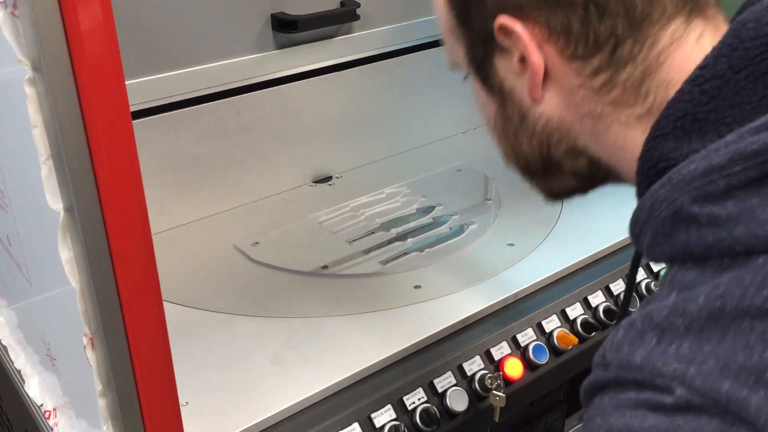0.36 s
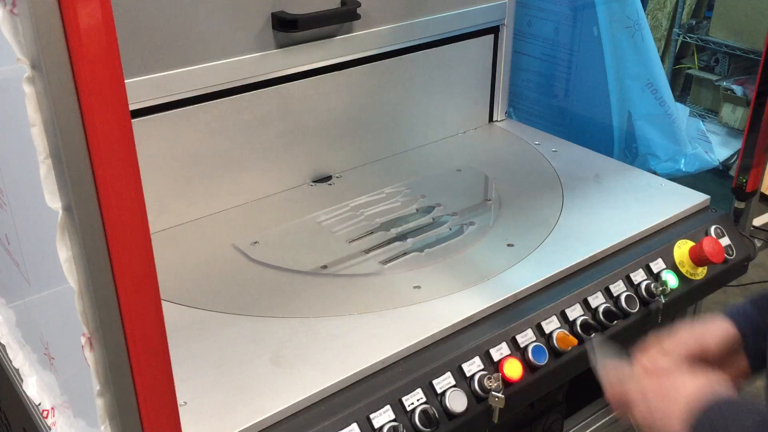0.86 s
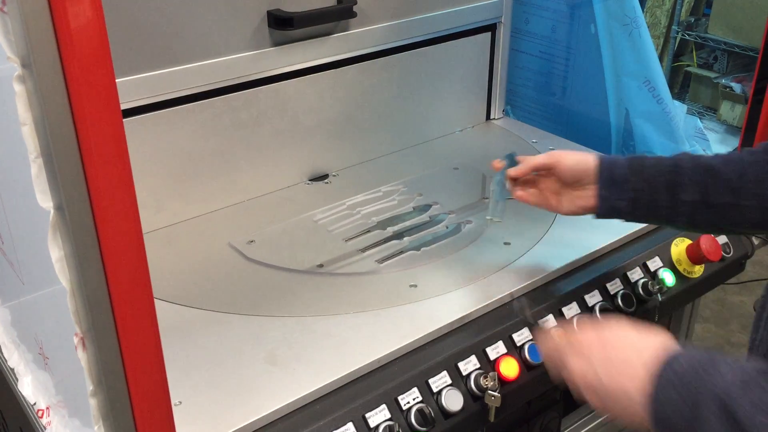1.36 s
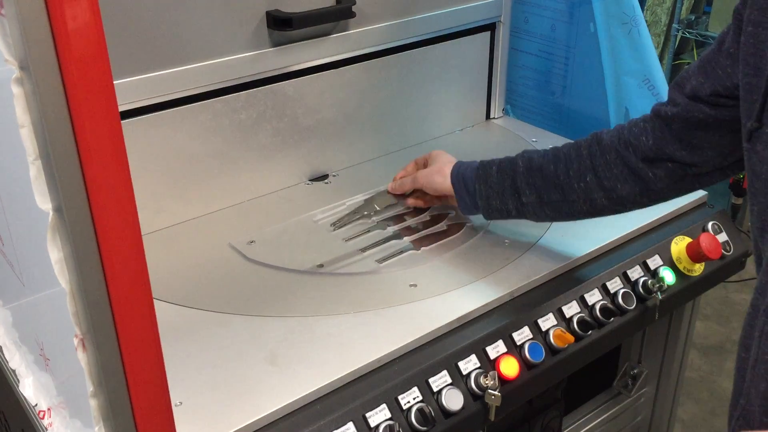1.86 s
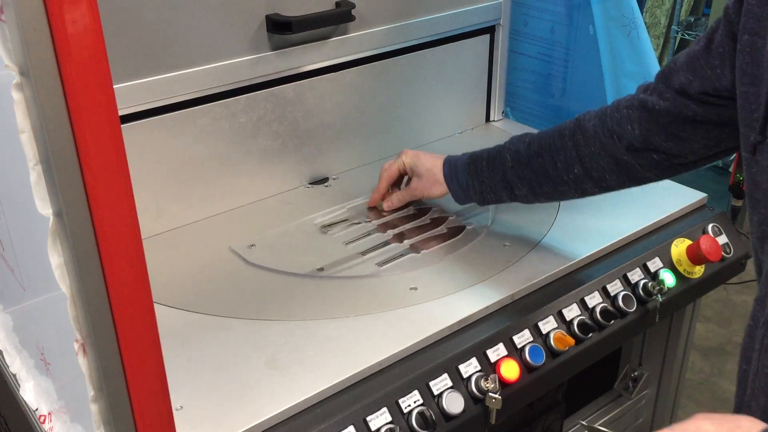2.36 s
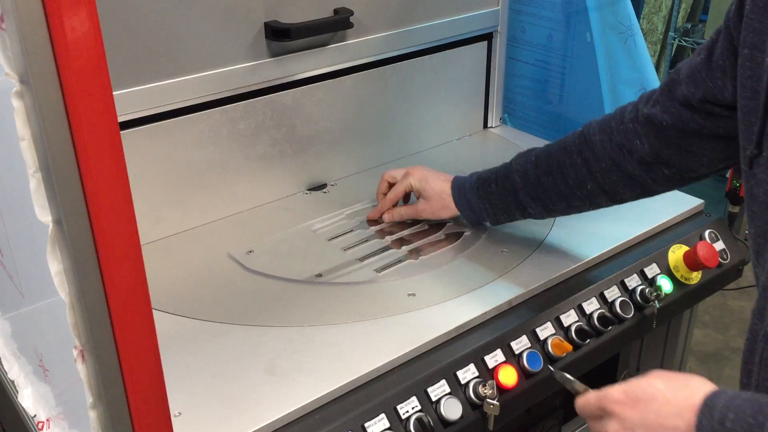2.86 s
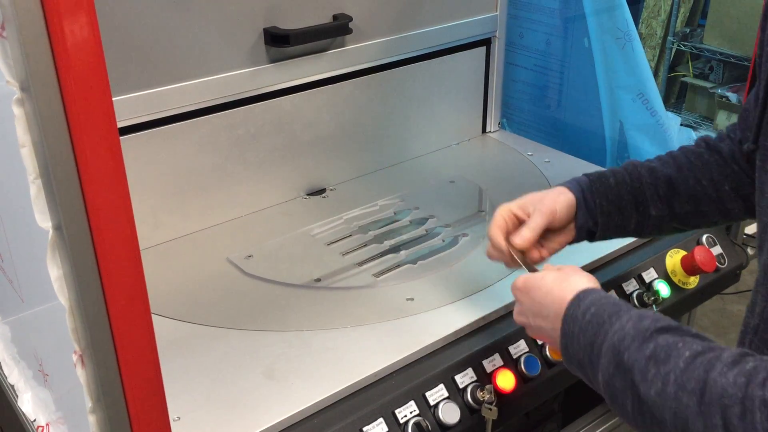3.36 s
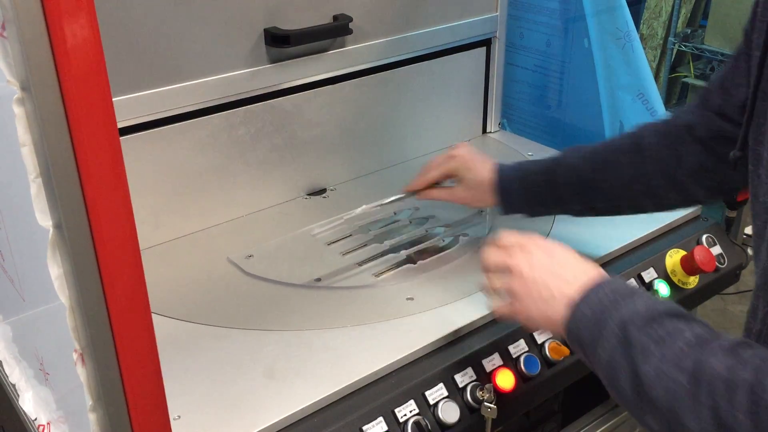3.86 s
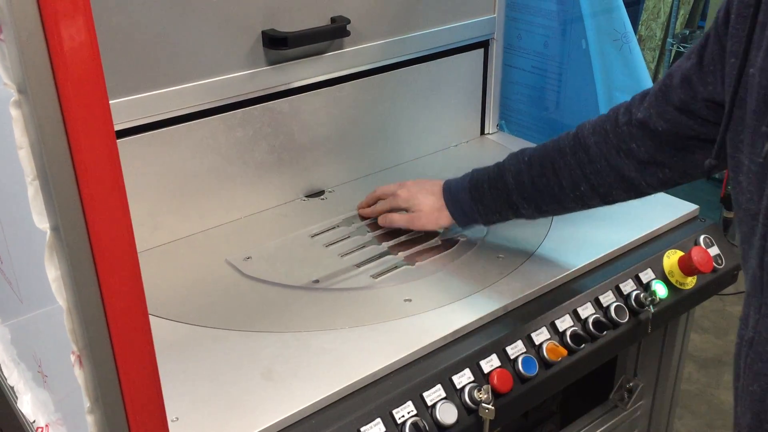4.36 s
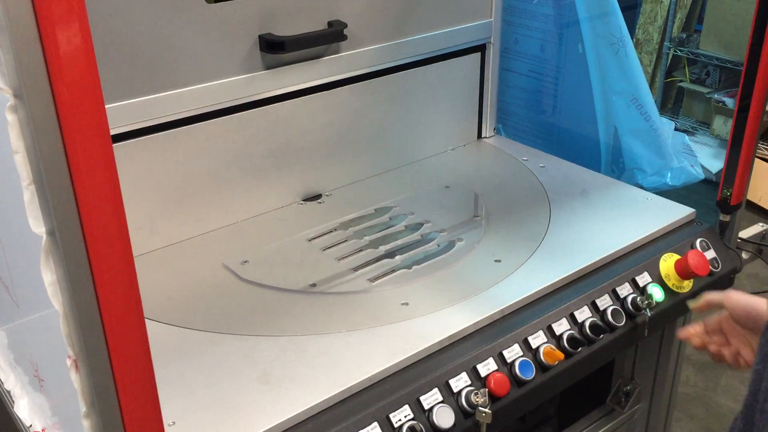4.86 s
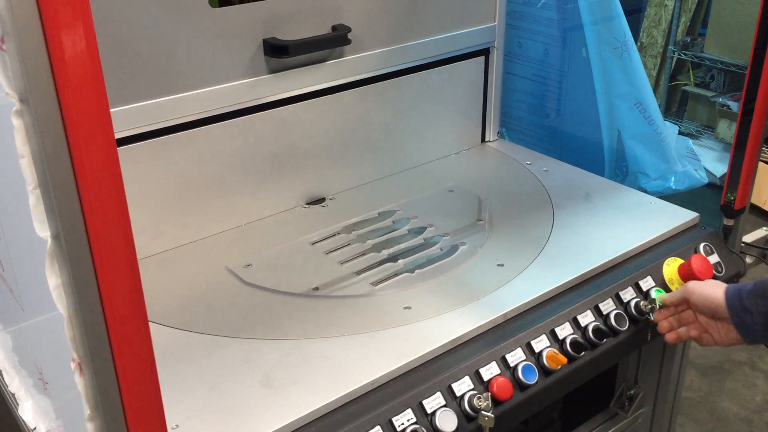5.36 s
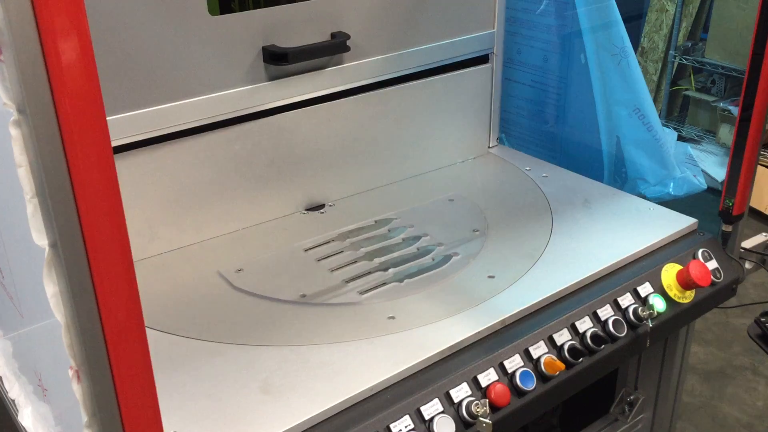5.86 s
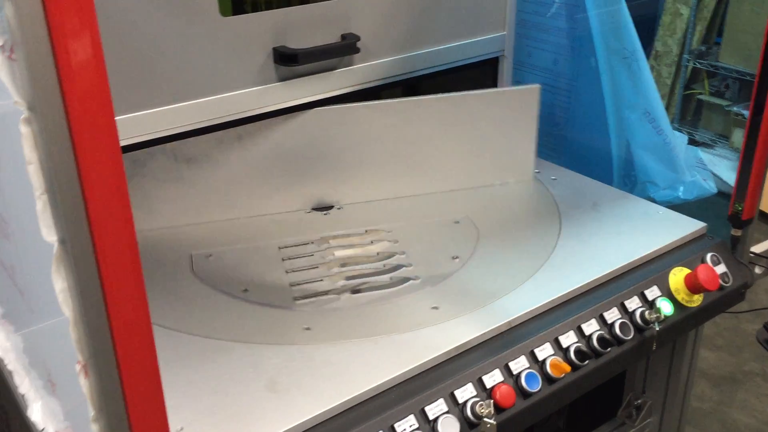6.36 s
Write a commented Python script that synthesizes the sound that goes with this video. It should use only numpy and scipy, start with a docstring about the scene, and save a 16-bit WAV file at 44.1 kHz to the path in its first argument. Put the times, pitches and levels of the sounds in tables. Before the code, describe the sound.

Bright clicks and ringing rattles of small hard parts on a metal plate, distant machine thumps, a button press, an air vent and fading drive whirr.

```python
"""Hard thin strips laid into the slots of a metal fixture click, rattle and ring: decaying modes plus noise cracks.
Far machines thump and a valve vents as swelling noise bands, some with a low sine boom; a button is pressed.
The table drive starts as wandering resonant noise with hissing puffs of air.
A steady hum of fans and motors, broad noise with narrow resonances, lies under all."""
import sys
import numpy as np
from scipy import signal
from scipy.fft import rfft, irfft
from scipy.io import wavfile

SR = 44100
rng = np.random.default_rng(int(sys.argv[2]) if len(sys.argv) > 2 else 0)


def to_wav(s):
    """Save 16-bit WAV."""
    ch = np.atleast_2d(s).T  # columns
    pcm = np.round(np.clip(ch, -1, 1) * 32767)  # PCM
    wavfile.write(sys.argv[1], SR, pcm.astype(np.int16))


def volts_from_decibels(level):
    """Turn decibel levels (scalar or array-like) into linear amplitude factors."""
    exponent = np.asarray(level, float) / 20
    return 10 ** exponent


N = 297219

# broad fan noise: (frequency [Hz], relative density [dB])
FAN_COLOUR = [(15, -63.5), (25, -22.5), (60, -11), (114, -8.5), (259, 0.5), (330, -12), (389, -10),
              (600, -4), (787, -11.5), (1280, -9.5), (1510, -17.5), (1640, -16), (3230, -28), (6210, -36),
              (16500, -54)]
# resonances of the hum: (frequency [Hz], width [Hz], rms level [dB])
HUM_BANDS = [(63, 10, -70.5), (76, 6.1, -69.5), (124.8, 17, -54.5), (162.3, 14, -60.5), (172, 6.4, -62),
             (228, 16, -58.5), (257.6, 25, -57), (394.5, 8, -59.5), (487.5, 5.8, -62), (527, 5.7, -64.5),
             (619, 13, -64), (710.8, 12, -62.5), (966, 20, -62), (1245, 29, -61), (1315, 80, -62),
             (1594, 60, -68), (6200, 500, -80)]
# whirr of the drive: (frequency [Hz], relative density [dB])
WHIRR_COLOUR = [(880, -23.5), (1500, 3), (1800, 2.5), (2440, 4), (2770, -2.5), (3940, 2.5), (4810, -2.5),
                (5220, -5.5), (5920, -6.5), (7630, -18), (8980, -11.5), (10300, -22), (13000, -21)]
# resonances of the drive housing: (frequency [Hz], width [Hz], relative level [dB])
HOUSING_BANDS = [(2886, 40, 4.5), (3210, 99, -2.5), (3830, 48, 4), (4465, 87, 0), (5180, 130, -6.5),
                 (5420, 34, 2.5), (6000, 97, -12), (8800, 72, -14), (9110, 110, -17)]
# puffs of air while the table turns: (start [s], length [s], hiss [dB], swell of the whirr [dB])
AIR_PUFFS = [(5.536, 0.027, -66, 10.5), (5.822, .085, -65, 2), (6.16, 0.14, -71, 3.5),
             (6.62, .06, -78, 0.5)]
# two thumps of far machines, then the valve: (time [s], level [dB], rise [s], bass t60 [s], treble t60 [s])
FAR_BLASTS = [(1.262, -27, 0.017, 0.59, 0.23), (4.818, -25.5, 0.014, 0.55, 0.21),
              (5.35, -27, 0.011, 0.35, 0.32)]
# their colours in the same order: (frequency [Hz], relative density [dB])
PRESS_COLOUR = [(59, -45.5), (100, -9), (215, -5.5), (535, -8.5), (801, -11), (872, -10.5), (1680, -18),
                (2520, -15.5), (2860, -20), (8460, -19.5), (16000, -36)]
STAMP_COLOUR = [(59, -53), (100, -29), (202, -4.5), (295, -5.5), (502, -2.5), (836, -15), (970, -5),
                (1130, -12.5), (1650, -21), (2630, -12.5), (3470, -21.5), (5770, -21.5), (16000, -43)]
VALVE_COLOUR = [(59, -32), (100, 5), (234, -3), (350, 0), (461, -8), (535, -18), (970, -11), (1080, -17),
                (1800, -6), (2750, -4.5), (2990, -5), (6020, -6), (16000, -20.5)]
# the floor shakes: (time [s], level [dB])
FLOOR_BOOMS = [(1.291, -44), (5.359, -40)]
# button and small touches: (time [s], level [dB], centre [Hz], half-width [octaves], rise [s], t60 [s])
SMALL_TOUCHES = [(0.736, -48.5, 4540, 1.5, 0.016, 0.15), (2.187, -34, 420, 1.5, 0.0053, 0.2),
                 (2.632, -42, 304, 1.4, 0.0052, 0.31), (2.844, -38.5, 404, 1.4, .003, .15),
                 (4.215, -40.5, 600, 1.2, 0.0057, 1), (5.325, -53.5, 4940, 2.8, 0.011, 0.42),
                 (2.685, -36.5, 254.7, 0.61, 0.0046, .12), (5.309, -57, 11150, 1.2, 0.00092, 0.032),
                 (5.32, -37, 1770, 1.9, 0.00095, 0.15), (5.322, -42, 3960, 1.3, 0.00092, 0.032),
                 (5.541, -44, 3500, 1.9, .008, 0.059)]
# decay of the booth: (frequency [Hz], t60 [s])
BOOTH_DECAY = [(300, 0.67), (1500, 0.36), (5000, 0.17), (12000, 0.11)]
# fixture plate: (frequency [Hz], relative level before halving [dB], free t60 [s])
PLATE_MODES = [(420, -6, 0.024), (519, -3, 0.039), (666, -6, .06), (900, -0.5, 0.021), (1020, -9, 0.098),
               (1256, -17.5, .05), (1278, -17.5, 0.06), (1385, -14.5, 0.098), (1560, -18, .05),
               (1730, 1.5, .05), (1860, 0.5, 0.0397), (2170, -7, 0.041), (2515, -10, .04)]
# blows that reach the plate: (time [s], level [dB], favoured mode [Hz])
PLATE_KNOCKS = [(0.164, -34, 1730), (0.207, -36, 1730), (0.415, -37.5, 1720), (1.979, -37.5, 603),
                (2.092, -37, 800), (2.14, -29, 1040), (2.186, -19.5, 1456), (2.204, -24, 595),
                (2.228, -23.5, 680), (2.491, -36, 921), (2.511, -31.5, 1790), (2.63, -34, 1475),
                (2.665, -48, 1760), (2.689, -37, 585), (2.718, -34.5, 1804), (2.817, -33, 587),
                (2.843, -19, 1405), (4.197, -33, 990), (4.213, -19.5, 1860), (4.235, -26.5, 1840),
                (4.252, -22.5, 996), (4.271, -26.5, 732), (4.313, -39, 960), (4.525, -41.5, 1020)]
# strips: (frequency [Hz], relative level [dB], free t60 [s])
STRIP_MODES = [(2610, -9, .2), (2740, -12, .15), (3170, -9, .1), (3590, -9, .07), (4340, -12, .08),
               (4600, -14, .05), (5150, -5, .06), (5320, -3, .09), (5440, -6, .06), (5710, -8, .05),
               (6050, -9, .06), (6215, -8, .13), (6800, -14, .08), (7310, -3, .12), (7465, -2, .14),
               (7650, 0, .07), (8170, -14, .08), (8800, -18, .06), (9935, -6, .08), (10090, -9, .08),
               (10190, -4, .08), (11315, -5, .09), (11495, -5, .08), (12100, -9, .16), (12390, -9, .1),
               (12800, -6, .06), (13070, -5, .07), (13815, -4, .09), (14310, -5, .08), (15450, -12, .08),
               (15735, -5, .08)]
# a strip left free rings on with a thin tone: (time [s], level [dB], frequency [Hz], t60 [s])
THIN_TONES = [(0.0438, -51, 2645, 0.47), (.474, -55.5, 10820, 1), (0.473, -37, 3390, 0.21),
              (1.114, -56, 7470, 0.15), (1.114, -59, 12100, 0.21), (2.189, -48.5, 11150, 0.27),
              (2.188, -41.5, 2787, 0.35), (0.475, -29, 9920, 0.12), (2.187, -28, 10190, .12),
              (2.513, -36, 10300, 0.096), (2.5122, -36.5, 13070, 0.066), (2.5121, -38, 3243, .1),
              (1.034, -48, 6000, .06), (2.847, -21.5, 6215, 0.2), (2.847, -45.5, 11080, 0.4),
              (2.846, -36.5, 2730, 0.34), (4.254, -20.5, 11300, 0.068), (4.3143, -39, 15480, .2),
              (4.524, -77, 12140, 0.48)]
# dry contact cracks, alone or on top of a ringing clink: (time [s], level [dB], relative treble [dB])
DRY_CRACKS = [(1.8411, -47.5, -5), (1.9804, -31.5, -7), (2.0864, -45, -13.5), (2.092, -39, -10),
              (2.1866, -12, -12), (2.29, -39, -20), (2.492, -33, -8), (2.6317, -35.5, -28.5),
              (2.6666, -47.5, -19.5), (2.6897, -45, -11), (2.719, -40, -25.5), (2.8159, -54.5, 0),
              (2.8357, -31.5, 1), (2.8417, -21, 5), (3.9494, -61.5, -4), (4.0492, -68, -14),
              (4.136, -30, -13.5), (4.1474, -42, -19), (4.1984, -35, 1), (4.214, -27, -14.5),
              (4.313, -22.5, 1), (4.5223, -38, -30)]
# strips shaken in the fingers, one list per stretch: (time [s], level [dB], brightness [dB per band])
SHAKES = [
    [(0.0, -39, -3.5), (0.038, -34.5, -4.5), (0.041, -19.5, -2)],
    [(0.044, -23.5, 4), (0.062, -25.5, -3.5), (0.094, -19, 3.5), (0.146, -28, -1), (0.161, -30, 0)],
    [(0.165, -16, 1.5), (0.203, -25, -0.5), (0.211, -21, 1.5), (0.307, -34.5, -0.5), (0.329, -28.5, 4),
     (0.411, -42.5, -3)],
    [(0.416, -30, 2.5), (0.47, -28, -1.5), (0.476, -30, -0.5), (0.534, -42.5, -2), (0.62, -55, -1.5)],
    [(2.53, -42, -2.5), (2.55, -50, -4.5), (2.62, -60, -2.5)],
    [(2.73, -48.5, -1), (2.778, -62, -1.5), (2.83, -46, -5)],
    [(4.225, -41, -10), (4.243, -32.5, -0.5), (4.259, -19, -1.5), (4.308, -46.5, 0)],
]
# rattle share of the lowest, low, middle and high modes: (share [dB])
RATTLE_SHARES_DB = [-8, -8, -11, -9]
# strip rings against strip or slot:
# (time [s], level [dB], favoured low mode [Hz], relative middle modes [dB], relative high modes [dB])
STRIP_CLINKS = [(0.0432, -20, 3595, -3.5, 0), (0.08, -29, 5290, -6, 11), (0.1625, -21.5, 5020, 3, -8.5),
                (.2071, -18.5, 5360, -2, -6.5), (0.414, -28.5, 5470, -26, -13), (.474, -30, 5430, -6, -3),
                (1.0334, -34, 4340, -32, -16), (1.068, -53, 4530, -24, -7), (1.0835, -41, 4600, -27, -15),
                (1.113, -51.5, 5900, 6, 4), (1.8416, -34, 5560, -10, -10.5),
                (1.8656, -39.5, 5240, -23, -13), (2.139, -15, 5450, -22, -14.5),
                (2.1523, -27.5, 5400, -5, -1.5), (2.188, -12, 5420, -9, -3), (2.203, -27, 5000, -19.5, -9),
                (2.51, -24.5, 5440, -14, -5.5), (2.6487, -40.5, 5360, -20.5, -20),
                (2.718, -28, 5720, -23, -19.5), (2.8424, -10, 5150, 1.5, 6), (2.8463, -11, 6180, -6, -6.5),
                (4.134, -30, 4590, -14, -7), (4.213, -15, 5180, -8, -16), (4.2542, -21, 5180, -3, -18.5),
                (4.2706, -24, 5180, 4.5, -19), (4.313, -16, 5100, -12, -4)]

HELD = 0.48   # share of the free t60 left after a single blow
LOOSE = 0.65   # share of the free t60 left while the strips rattle
MIDDLE_HZ, HIGH_HZ = 6600, 9000   # lower limits of the middle and high strip modes


def rms_one(x):
    """Scale to rms 1."""
    return x / np.sqrt(np.mean(x ** 2) + 1e-20)


def at_hz(points, hz):
    """Read a table on a log-frequency axis."""
    table_hz, value = np.transpose(points)
    return np.interp(np.log(hz), np.log(table_hz), value)


def coloured(points, size=N):
    """Noise of the given relative density, rms 1."""
    hz = np.maximum(np.fft.rfftfreq(size, 1 / SR), 1)
    white = rfft(rng.standard_normal(size))
    return rms_one(irfft(white * volts_from_decibels(at_hz(points, hz)), size))


def band_noise(white, low_hz, high_hz):
    """White noise through a band-pass."""
    return signal.sosfilt(signal.butter(2, [low_hz, high_hz], "band", fs=SR, output="sos"), white)


def drift(knots_per_s):
    """Slow wander: random knots of spread 1 joined by straight lines."""
    knots = rng.standard_normal(int(N / SR * 60))
    return np.interp(np.arange(N) / SR * knots_per_s, np.arange(len(knots)), knots)


def place(s, sound):
    """Place a short sound at its time."""
    return np.pad(sound, (int(s * SR), N))[:N]


def swell_and_die(t, level_db, rise_s, t60_s):
    """Envelope: smooth rise, exponential decay."""
    return volts_from_decibels(level_db - 60 * t / t60_s) * (1 - np.exp(-(t / rise_s) ** 2))


def ring(clicks, hz, t60_s):
    """Two-pole resonator: a unit click starts a decaying sine of height 1."""
    r, w = volts_from_decibels(-60 / (t60_s * SR)), 2 * np.pi * hz / SR
    return signal.lfilter([0, np.sin(w)], [1, -2 * r * np.cos(w), r * r], clicks + 1e-18)


def favour(modes, favoured_hz):
    """Gain [dB], modes by touches: modes near the favoured pitch rise to 0 dB, the others sink."""
    hz, own_db = np.array(modes)[:, :1], np.array(modes)[:, 1:2]
    near = np.exp(-(np.log(hz / favoured_hz) / 0.068) ** 2)
    return (1 - near) * (own_db - 7.5)


def strike(at, modes, force_db, chatter_s, scatter_db):
    """Each touch clicks every mode once, then with three weaker rebounds."""
    out = np.zeros(N)
    luck = rng.standard_normal((len(at), len(modes), 4))
    late = (rng.random((len(at), 3)) * chatter_s * 3 * SR).astype(int)
    for k, (hz, _, t60_s) in enumerate(modes):
        size = volts_from_decibels(force_db[k] + scatter_db * luck[:, k, 0])
        rebound = 0.38 * size[:, None] * np.sign(luck[:, k, 1:])
        clicks = np.zeros(N)
        np.add.at(clicks, at, size * (-1) ** k)
        np.add.at(clicks, at[:, None] + late, rebound)
        out += ring(clicks, hz, HELD * t60_s)
    return out


def cracks(at, level_db, high_db, fade_s):
    """Dry contact: a short puff of noise per touch, in a middle and a top band."""
    out, t = np.zeros(N), np.arange(1500) / SR
    middle = coloured([(900, -39.5), (3000, 3.5), (5500, 1), (8500, -6.5), (10000, -29.0)])
    top = coloured([(7000, -30.5), (9000, 3.5), (16000, -14)])
    for i, mid_db, top_db in zip(at, level_db, level_db + high_db):
        span = slice(i, i + len(t))
        out[span] += np.exp(-t / fade_s) * (volts_from_decibels(mid_db) * middle[span] + volts_from_decibels(top_db) * top[span])
    return out


def hall():
    """Broad fan noise with narrow bands where motors and ducts resonate."""
    fans = volts_from_decibels(-49 + .8 * drift(14)) * coloured(FAN_COLOUR)
    hz = np.fft.rfftfreq(N, 1 / SR)
    white = rfft(rng.standard_normal(N))
    power = sum(volts_from_decibels(level_db) ** 2 / width_hz / (1 + (2 * (hz - f) / width_hz) ** 2) ** 2
                for f, width_hz, level_db in HUM_BANDS)
    return fans + irfft(white * np.sqrt(power * SR * 2 / np.pi), N)


def drive():
    """Gears and bearings whirr broadly and in housing resonances; air escapes in soft bright puffs."""
    since_s = np.arange(N) / SR - 5.47   # drive starts
    t = np.arange(N) / SR
    start_s, length_s, hiss_db, swell_db = np.transpose(AIR_PUFFS)[:, :, None]
    edge_s = 0.015
    gates = .5 * (np.tanh((t - start_s) / edge_s) - np.tanh((t - start_s - length_s) / edge_s))

    whirr_db = -54 - 4.0 * since_s + np.sum(swell_db * gates, axis=0)
    seep = volts_from_decibels(-80)
    leak = volts_from_decibels(-62 - 43 * np.maximum(since_s, 0))
    hiss = seep + leak + np.sum(volts_from_decibels(hiss_db) * gates, axis=0)

    hz = np.fft.rfftfreq(N, 1 / SR)
    white = rfft(rng.standard_normal(N))
    housing = np.zeros(N)
    for f, width_hz, level_db in HOUSING_BANDS:
        band = irfft(white / (1 + (2 * (hz - f) / width_hz) ** 2), N)
        housing += volts_from_decibels(level_db + 4.0 * drift(6)) * band
    body = coloured(WHIRR_COLOUR) + volts_from_decibels(-7.5) * rms_one(housing)
    whirr = volts_from_decibels(whirr_db + 1.17 * drift(5.7)) * body
    air = hiss * coloured([(4000, -13), (9000, 5.5), (16000, -9.0)])
    return (since_s > 0) * (whirr + air)


def far_machines_and_valve():
    """Noise bands swell together and die, the treble first."""
    out, t = np.zeros(N), np.arange(16384) / SR
    hz = np.fft.rfftfreq(len(t), 1 / SR)
    edges_hz = [40, 500, 1400, 4000, 9000, 19000]
    colours = [PRESS_COLOUR, STAMP_COLOUR, VALVE_COLOUR]
    for (s, level_db, rise_s, bass_t60_s, treble_t60_s), colour in zip(FAR_BLASTS, colours):
        spectrum = rfft(coloured(colour, size=len(t)))
        t60s = np.geomspace(bass_t60_s, treble_t60_s, len(edges_hz) - 1)
        for low, high, t60_s in zip(edges_hz, edges_hz[1:], t60s):
            band = irfft(spectrum * (hz >= low) * (hz < high))
            out += place(s, swell_and_die(t, level_db, rise_s, t60_s) * band)
    return out


def floor_booms():
    """The floor shakes as a decaying low sine."""
    out, t = np.zeros(N), np.arange(16384) / SR
    for s, level_db in FLOOR_BOOMS:
        tone = np.sin(2 * np.pi * 60.7 * t)
        out += place(s, volts_from_decibels(level_db - 60 * t / 0.72) * tone * (1 - np.exp(-t / 0.014)))
    return out


def touches():
    """Button and small touches: one band of noise each, swelling and dying."""
    out, t = np.zeros(N), np.arange(16384) / SR
    for s, level_db, centre_hz, octaves, rise_s, t60_s in SMALL_TOUCHES:
        ratio = 2 ** octaves
        colour = [(centre_hz / ratio, -30), (centre_hz, 0), (centre_hz * ratio, -30), (40000, -50)]
        out += place(s, swell_and_die(t, level_db, rise_s, t60_s) * coloured(colour, size=len(t)))
    return out


def booth(x):
    """Sheet-metal booth and far walls answer with a dense noise tail, shorter or fainter in the treble."""
    t, tail = np.arange(22050) / SR, 0
    edges_hz = 200 * 2 ** np.arange(0, 6.6, .5)
    white = rng.standard_normal((2, len(t)))
    for k, (low, high) in enumerate(zip(edges_hz, edges_hz[1:])):
        band = band_noise(white[k % 2], low, high)
        near_walls = volts_from_decibels(-60 * t / at_hz(BOOTH_DECAY, np.sqrt(low * high)))
        # air swallows the treble of the far answer
        dull_db = 11.0 * max(np.log2(low / 4000), 0)
        far_walls = volts_from_decibels(-24 - dull_db - 60 * t / 0.66)
        tail = tail + band * (near_walls + far_walls)
    tail = tail * (1 - np.exp(-(t / 0.0037) ** 2))
    return volts_from_decibels(-7) * signal.fftconvolve(x, tail / np.sqrt(np.sum(tail ** 2)))[:N]


def knocks():
    """Blows reach the fixture plate and ring its modes."""
    s, level_db, plate_hz = np.transpose(PLATE_KNOCKS)
    force_db = level_db + .5 * favour(PLATE_MODES, plate_hz)
    return strike((s * SR).astype(int), PLATE_MODES, force_db, chatter_s=.0042, scatter_db=2.0)


def pings():
    """Decaying tones of free strips, each with a weaker twin mode that makes it beat."""
    out, t = np.zeros(N), np.arange(32768) / SR
    beat_hz, twin_db = 22.0, -6.5
    for s, level_db, hz, t60_s in THIN_TONES:
        tone = np.sin(2 * np.pi * hz * t)
        twin = volts_from_decibels(twin_db) * np.sin(2 * np.pi * (hz + beat_hz) * t)
        out += place(s, volts_from_decibels(level_db - 60 * t / t60_s) * (tone + twin))
    return out


def dry_cracks():
    """Dry contact noise, alone or on top of a ringing clink."""
    s, level_db, treble_db = np.transpose(DRY_CRACKS)
    return cracks((s * SR).astype(int), level_db, treble_db, fade_s=0.0022)


def grips():
    """Clink samples, relative strip mode strengths and group levels; the grip favours one low mode."""
    s, level_db, low_hz, middle_db, high_db = np.transpose(STRIP_CLINKS)
    hz, own_db = np.array(STRIP_MODES)[:, :1], np.array(STRIP_MODES)[:, 1:2]
    group = (hz > MIDDLE_HZ) * 1 + (hz > HIGH_HZ)
    shares_db = np.choose(group, [favour(STRIP_MODES, low_hz), own_db + 0 * s, own_db - 2.5 + 0 * s])
    return (s * SR).astype(int), shares_db, level_db + np.choose(group, [0 * s, middle_db, high_db])


def shake_forces(edge_count):
    """Level of each mode band over time; silent between the stretches."""
    t, force = np.arange(N) / SR, np.zeros((edge_count - 1, N))
    tilt = np.c_[[-1.5, -.5, .5, 1.5]]
    for rows in SHAKES:
        s, level_db, bright_db = np.transpose(rows)
        shake_db = np.interp(t, s, level_db, -200, -200)
        force += volts_from_decibels(shake_db + np.reshape(RATTLE_SHARES_DB, (-1, 1)) + np.interp(t, s, bright_db) * tilt)
    return force


def rattle():
    """Dense small contacts drive the strip modes, favoured as in the last clink, over a dry rasp."""
    contacts_per_s, size_db, ring_db, rasp_db, wander_db = 2200.0, 4.0, -6.5, -8.5, 6.5
    contacts = rng.random(N) < contacts_per_s / SR
    grains = rms_one(contacts * volts_from_decibels(size_db * np.minimum(rng.exponential(1, N), 4)))
    edges_hz = [1500, 4000, MIDDLE_HZ, HIGH_HZ, 16000]
    force = shake_forces(len(edges_hz))
    at, shares_db, _ = grips()
    last = np.maximum(np.searchsorted(at, np.arange(N)) - 1, 0)
    out = np.zeros(N)
    for (hz, own_db, t60_s), share_db in zip(STRIP_MODES, shares_db):
        mode_db = own_db if hz < edges_hz[1] else share_db[last]
        # long rings gather more grains: even them out
        gain = volts_from_decibels(mode_db + ring_db + wander_db * drift(20)) / np.sqrt(t60_s * SR / 28)
        clicks = grains * rng.choice([-1, 1], N) * force[np.searchsorted(edges_hz, hz) - 1]
        out += ring(clicks * gain, hz, LOOSE * t60_s)
    for level, low, high in zip(force, edges_hz, edges_hz[1:]):
        out += volts_from_decibels(rasp_db) * level * rms_one(band_noise(rng.standard_normal(N), low, high))
    return out


def clinks():
    """Strip against strip or slot: ringing modes and a dry crack."""
    at, shares_db, level_db = grips()
    ringing = strike(at, STRIP_MODES, shares_db + level_db - 5.5, chatter_s=.002, scatter_db=3.0)
    # first row: low modes; last row: high modes
    return ringing + cracks(at, level_db[0] - 9, level_db[-1] - level_db[0], fade_s=.004)


def scene():
    """Near sounds, high-passed, ring in the booth; the other layers bypass it."""
    near = knocks() + pings() + dry_cracks() + rattle() + clinks()
    near = signal.sosfilt(signal.butter(2, 300, "high", fs=SR, output="sos"), near)
    far = hall() + drive() + far_machines_and_valve() + floor_booms() + touches()
    return (far + near + booth(near))[None]


def top_cut(x):
    """Nothing passes above the cut-off."""
    return signal.sosfilt(signal.butter(12, 17170, fs=SR, output="sos"), x)


def record(dry):
    """The loudest peaks are rounded; the top falls away in two steps."""
    rounded = np.tanh(dry)
    hz = np.fft.rfftfreq(N, 1 / SR)
    top_db = np.interp(hz, [15730, 15910, 16550, 16750], [0, -27, -35, -60])
    mix = irfft(rfft(rounded) * volts_from_decibels(top_db), N)
    return top_cut(mix)


dry = scene()
out = record(dry)
to_wav(out)
```